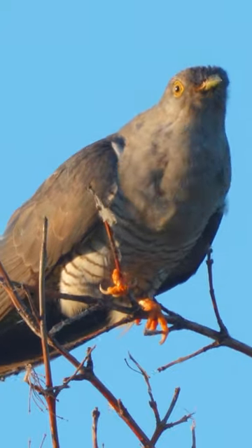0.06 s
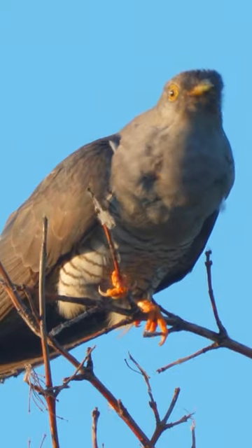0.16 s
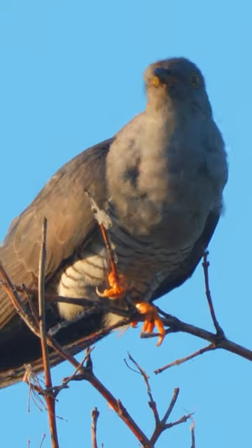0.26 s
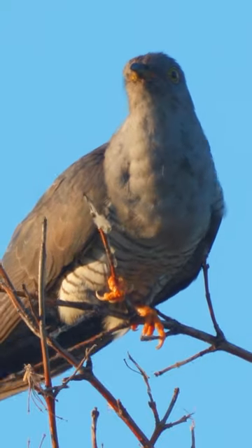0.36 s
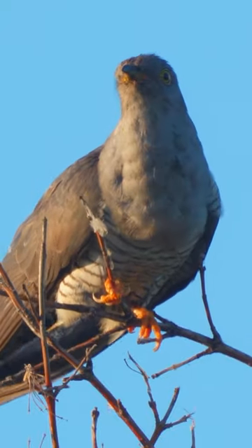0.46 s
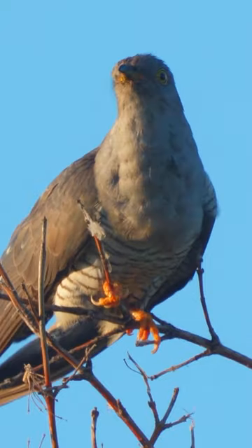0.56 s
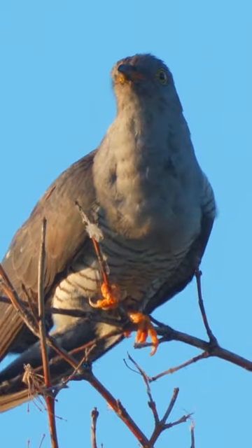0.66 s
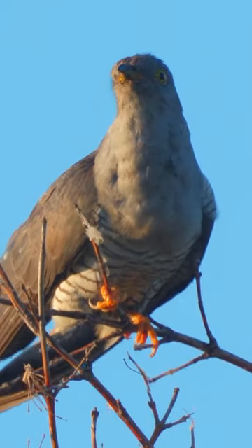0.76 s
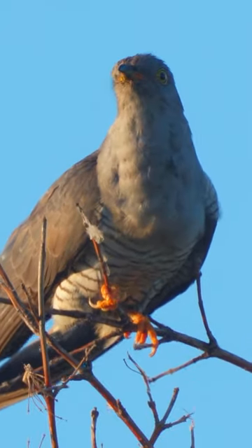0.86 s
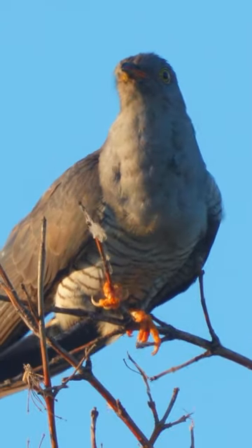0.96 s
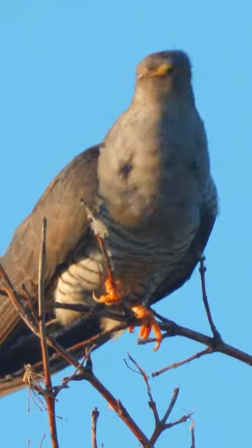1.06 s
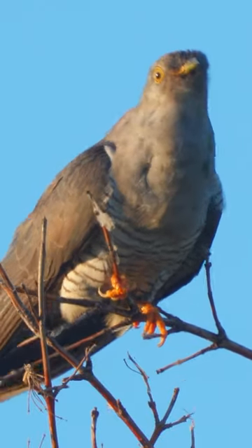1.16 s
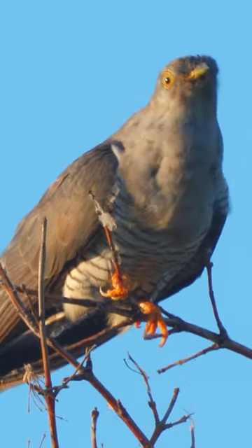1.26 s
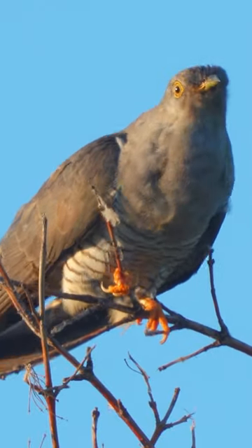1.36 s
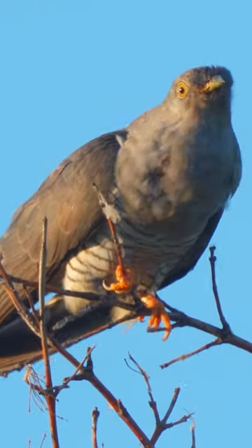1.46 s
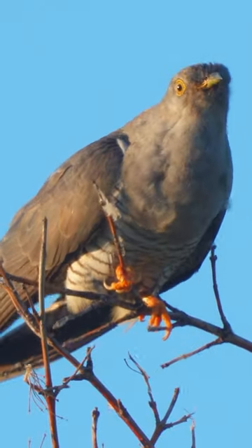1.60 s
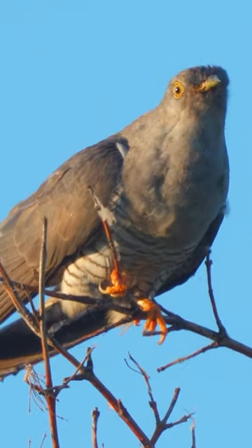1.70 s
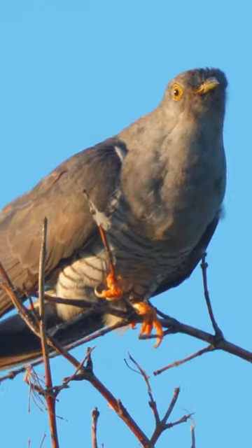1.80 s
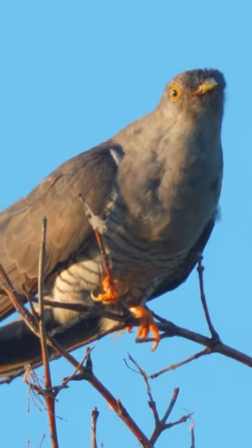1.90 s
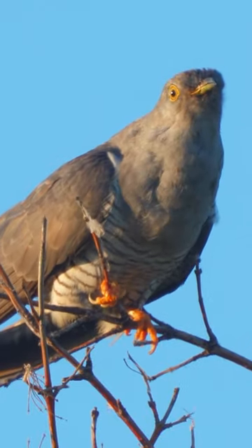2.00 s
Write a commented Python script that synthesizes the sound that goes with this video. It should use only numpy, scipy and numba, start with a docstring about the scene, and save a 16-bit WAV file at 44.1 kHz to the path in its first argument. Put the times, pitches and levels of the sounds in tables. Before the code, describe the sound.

A cuckoo dominates: opening on the echo of an earlier high note, it gives a loud, hollow low note at 0.2 s, then a brief, softer, rising high note at 1.1 and another loud low one at 1.45, with faint woodland echoes. Distant small birds whistle and trill, rattling at 1.6-1.8. Dull microphone knocks come at 0.8. A faint toad-like trill, traffic rumble, hiss and thin whine continue throughout.

```python
"""At a wood edge, a cuckoo on a bare branch calls two nearly pure notes, gliding sines that the trees echo.
Further off, small birds whistle, trill and rattle (sines bent and throbbed) and a toad-like trill pulses on.
Distant traffic rumbles and drones (shaped noise). At the microphone, soft knocks ring the camera's body, and
the camera adds hiss and a thin whine; its limiter pushes everything else down under each cuckoo note."""
import sys
import numpy as np
from scipy import signal
from scipy.fft import rfft, irfft
from scipy.io import wavfile
from scipy.ndimage import uniform_filter1d, minimum_filter1d, map_coordinates
from numba import njit

SR = 44100
rng = np.random.default_rng(int(sys.argv[2]) if len(sys.argv) > 2 else 0)


def log_audio(samples):
    """Write samples as a 16-bit WAV file to the path given in sys.argv[1]."""
    # one column per channel
    frames = np.atleast_2d(samples).T
    # limit to full scale, then quantise
    limited = np.clip(frames, -1, 1)
    pcm = np.round(limited * 32767).astype(np.int16)
    wavfile.write(sys.argv[1], SR, pcm)


N = 88200
PRE_S = .4  # lead-in, so that the echo of an earlier note is there at the start
M = N + int(PRE_S * SR)
T = np.arange(M) / SR - PRE_S  # seconds; the lead-in is negative


def undb(db):
    """Amplitude factor of a level in decibels."""
    return 10 ** (np.asarray(db) / 20)


def walk(rate_hz):
    """Smooth random drift about zero: levels held for 1 / rate_hz seconds and slewed twice."""
    hold = int(SR / rate_hz)
    steps = np.repeat(rng.standard_normal(M // hold + 1), hold)
    return 0.938 * uniform_filter1d(uniform_filter1d(steps, hold), hold)[:M]


def tail(t60_s):
    """Diffuse decay of unit energy, cut at 0.8 s, that builds up over its first 55 ms."""
    t = np.arange(int(SR * .8)) / SR
    decay = rng.standard_normal(len(t)) * np.exp(-np.log(1000) * t / t60_s) * np.minimum(t / 0.055, 1)
    return decay / np.sqrt(np.sum(decay ** 2))


def ring(t, hz, t60_s):
    """One damped resonance, starting at t = 0."""
    return np.sin(2 * np.pi * hz * t) * np.exp(-np.log(1000) * t / t60_s)


# The cuckoo's pitch glide within each note: share_of_length, pitch_hz
CU_PITCH = [(0, 491.4), (0.151, 571), (0.301, 629.6), (.45, 656), (.63, 673), (.8, 652.4), (.9, 613),
            (1, 519)]
KOO_PITCH = [(0, 495), (.1, 514.2), (.2, 519.7), (.6, 510.4), (0.851, 509.3), (1, 492)]
# Its level within each note: share_of_length, level_db (added to the note's level)
CU_LEVEL = [(0, -35), (.07, -20), (0.161, -15), (0.231, -6.5), (0.351, -2.5), (.5, 1), (.78, -1), (.9, 1.5),
            (.95, -6), (1.002, -22)]
KOO_LEVEL = [(0, -42), (.08, -15.5), (.16, -6), (0.282, -5.5), (.6, -3.5), (.84, -6.5), (.93, -5), (1, -30)]
# Calls, as they reach the limiter: start_s, length_s, level_db
CU_NOTES = [(-.145, 0.1016, 3), (1.108, .101, 3.5)]
KOO_NOTES = [(.192, 0.1644, 13.15), (1.446, 0.167, 13.6)]
# Overtones of each note, relative to its fundamental: second_harmonic_db, third_harmonic_db
OVERTONES_DB = {"cu": (-50, -52.5), "koo": (-57, -46)}
# Lift of each note in the echoes, as the higher note carries better: level_db
ECHO_LIFT_DB = {"cu": 2, "koo": -0.5}


def cuckoo_notes():
    """Near-sine notes with faint overtones, returned direct and as they set out for the wood edge."""
    direct, to_wood = np.zeros(M), np.zeros(M)
    kinds = (("cu", CU_NOTES, CU_PITCH, CU_LEVEL), ("koo", KOO_NOTES, KOO_PITCH, KOO_LEVEL))
    for kind, notes, pitch, level in kinds:
        for start_s, length_s, level_db in notes:
            share = (T - start_s) / length_s
            pitch_hz = uniform_filter1d(np.interp(share, *np.array(pitch).T), size=130)
            shape_db = uniform_filter1d(np.interp(share, *np.array(level).T), size=130)
            phase = 2 * np.pi * np.cumsum(pitch_hz) / SR
            tone = np.sin(phase)
            for harmonic, overtone_db in enumerate(OVERTONES_DB[kind], start=2):
                tone = tone + undb(overtone_db) * np.sin(harmonic * phase)
            # 4 ms fades, lying just outside the tabled start and end
            fade_s = np.minimum(share * length_s + 0.015, (1 - share) * length_s + 0.0086)
            note = tone * np.clip(fade_s / .004, 0, 1) * undb(level_db + shape_db)
            direct += note
            to_wood += note * undb(ECHO_LIFT_DB[kind])
    return direct, to_wood


# Distinct echoes from the wood edge: delay_s, level_db
WOOD_ECHOES = [(0.027, -40), (.058, -28.5), (.075, -35.5), (.1, -35), (.122, -30)]
SWAY_S, SWAY_HZ = .0006, 35  # leaves move, so each delay wavers: scale of the drift and its rate
WOOD_T60_S, WOOD_DB = 1, -30.5


def wood_echo(to_wood):
    """Reflections with wavering delays, and the diffuse tail of the wood."""
    out = np.zeros(M)
    for delay_s, level_db in WOOD_ECHOES:
        heard_at = np.arange(M) - (delay_s + SWAY_S * walk(SWAY_HZ)) * SR
        out += undb(level_db) * map_coordinates(to_wood, [heard_at], order=1)
    return out + undb(WOOD_DB) * signal.fftconvolve(to_wood, tail(WOOD_T60_S))[:M]


def cuckoo():
    """The direct call and its return from the wood edge."""
    direct, to_wood = cuckoo_notes()
    return direct + wood_echo(to_wood)


FADE_S = .012  # longest fade of a whistle, trill or rattle
# Small birds' whistles, further off: start_s, end_s, pitch_hz at start, middle, end, level_db
WHISTLES = [(0, .022, 3400, 3150, 2800, -36), (.03, .085, 4850, 4350, 3600, -50),
            (.14, .165, 4150, 4150, 4120, -44), (.338, .402, 2620, 2680, 2610, -40),
            (.412, .456, 4500, 4420, 3980, -32), (.548, .606, 2980, 2880, 2760, -43),
            (.555, .60, 4120, 4030, 3950, -46), (.61, .69, 3500, 3670, 3620, -48),
            (.742, .772, 3500, 3420, 3350, -44), (.77, .83, 3700, 3800, 3970, -45),
            (.815, .90, 3970, 3990, 3900, -39), (.822, .86, 4150, 4800, 5600, -48),
            (.858, .912, 3800, 3520, 3350, -42), (.885, 1.01, 3900, 3870, 3820, -42),
            (1.0, 1.07, 3830, 3960, 3900, -44), (1.09, 1.14, 4050, 4190, 4320, -41),
            (1.124, 1.144, 4320, 4150, 3800, -40), (1.132, 1.165, 4200, 4480, 4690, -42),
            (1.158, 1.196, 4680, 4720, 4520, -33), (1.20, 1.235, 4300, 3850, 3450, -47),
            (1.232, 1.278, 3950, 4110, 4300, -39), (1.27, 1.288, 4310, 4180, 3880, -38),
            (1.284, 1.312, 3550, 3170, 2900, -36), (1.32, 1.385, 3720, 3760, 3850, -44),
            (1.354, 1.365, 4200, 4550, 4900, -39), (1.362, 1.374, 4120, 4230, 4480, -34),
            (1.373, 1.385, 3800, 3870, 3920, -34), (1.392, 1.406, 3760, 3720, 3670, -32),
            (1.411, 1.428, 3680, 3460, 3340, -33), (1.426, 1.44, 3480, 3400, 3300, -40),
            (1.406, 1.426, 4050, 4120, 4150, -37), (1.424, 1.459, 4160, 4300, 3800, -38),
            (1.454, 1.485, 3620, 3230, 2950, -39), (1.435, 1.45, 2780, 2690, 2600, -32),
            (1.88, 1.905, 4000, 4400, 5000, -46), (1.94, 2, 3900, 4000, 3950, -46)]
# Their trills: start_s, end_s, pitch_hz at start, middle, end, level_db, swell_db (either side of the middle),
# warble_hz, warble_depth_hz, throb_hz, throb_share, pitch_scatter_hz (scale of the random drift)
TRILLS = [(.072, .18, 3555, 3180, 3000, -35, 1, 198.3, 189, 96.1, 0.48, 39.2),
          (.14, .35, 2700, 2640, 2700, -42.5, -1.5, 96.7, 63.5, 95.6, 0.44, 23),
          (.166, .37, 3033, 2980, 2900, -42, -1, 94.5, 167, 97, 0.404, 26),
          (.243, .43, 4104, 4420, 4470, -37, 4, 95, -91, 97.1, 0.3, 12),
          (.384, .51, 3520, 3600, 3530, -56, 3.5, 100, 30, 31.7, .95, 20),
          (.514, .592, 3680, 3270, 3070, -41.5, 1.5, 296.5, 148, 96, 0.48, 31),
          (.625, .745, 2330, 2400, 2560, -54, -1, 100, 33, 25.3, 0.78, 30),
          (.91, .95, 4210, 4050, 3900, -40.5, 1, 100.6, 197.5, 59.6, 0.44, 100),
          (.995, 1.09, 2536, 2600, 2300, -47, -3, 100, 195, 50, 0.29, 116),
          (1.225, 1.27, 3343, 3400, 3280, -37.5, -6.5, 109, 63, 110, 0.44, 35),
          (1.239, 1.31, 2784, 3200, 2800, -41, 2, 98.2, 343.5, 98, 0.83, 59),]
WHISTLE_SCATTER_HZ, WARBLE_DRIFT = 40, .01  # scales of the drift in pitch and in warble and throb rate


def whistles_and_trills():
    """Gliding sines with unsteady pitch; trills also warble in pitch and throb in level."""
    out = np.zeros(M)
    # a whistle is a trill without swell, warble or throb
    plain = [tuple(w) + (0, 1, 0, 1, 0, WHISTLE_SCATTER_HZ) for w in WHISTLES]
    scatter = walk(350)
    uneven_s = np.cumsum(1 + WARBLE_DRIFT * walk(60)) / SR
    for (start_s, end_s, first_hz, middle_hz, last_hz, level_db, swell_db, warble_hz, warble_depth_hz,
         throb_hz, throb_share, scatter_hz) in plain + list(TRILLS):
        on = (T >= start_s) & (T < end_s)
        share = (T[on] - start_s) / (end_s - start_s)
        t = uneven_s[on] - uneven_s[on][0]
        # parabola through the three pitches
        bend_hz = 2 * (first_hz + last_hz - 2 * middle_hz)
        pitch_hz = middle_hz + (last_hz - first_hz) * (share - .5) + bend_hz * (share - .5) ** 2
        pitch_hz += warble_depth_hz * np.sin(2 * np.pi * warble_hz * t) + scatter_hz * scatter[on]
        fade = np.clip(np.minimum(share, 1 - share) * max((end_s - start_s) / FADE_S, 2), 0, 1)
        throb = 1 - throb_share * np.cos(2 * np.pi * throb_hz * t)
        level = fade * throb * undb(level_db + swell_db * 2 * (share - .5))
        out[on] += np.sqrt(2) * level * np.sin(2 * np.pi * np.cumsum(pitch_hz) / SR)
    return out


# The rattle's two voices, which take turns: pitch_hz at start, end, buzz_depth_hz at start, end,
# level_db at start, 0.4 of the length, end, gap_share, pitch_scatter_hz (scale of the random drift)
RATTLE_VOICES = [(3254, 3600, 270, 500, -38, -26.5, -32, 0.64, 60),
                 (2816, 2850, 79, 114, -43, -35.5, -37, .5, 130)]
RATTLE_START_S, RATTLE_END_S = 1.572, 1.808
RATTLE_HZ, BUZZ_HZ = 58.8, 296.5  # beats of each voice a second, buzz within a beat


def rattle():
    """A fast even rattle of alternating high and low beats; pitch and buzz depth grow toward the end."""
    length_s = RATTLE_END_S - RATTLE_START_S
    t = T - RATTLE_START_S
    share = np.clip(t / length_s, 0, 1)
    fade = np.clip(np.minimum(share, 1 - share) * length_s / FADE_S, 0, 1)
    buzz = np.sin(2 * np.pi * BUZZ_HZ * t)
    out = np.zeros(M)
    for k, (first_hz, last_hz, first_depth_hz, last_depth_hz, first_db, middle_db, last_db,
            gap_share, scatter_hz) in enumerate(RATTLE_VOICES):
        depth_hz = first_depth_hz + (last_depth_hz - first_depth_hz) * share ** 2
        pitch_hz = first_hz + (last_hz - first_hz) * share ** 2 + depth_hz * buzz + scatter_hz * walk(350)
        # the sign flips so that one voice fills the other's gaps
        beat = 1 - (-1) ** k * gap_share * np.cos(2 * np.pi * RATTLE_HZ * t)
        level = undb(np.interp(share, [0, .4, 1], [first_db, middle_db, last_db])) * fade
        out += level * beat * np.sin(2 * np.pi * np.cumsum(pitch_hz) / SR)
    return out


BIRD_WET_DB, BIRD_T60_S = -10, 0.13


def songbirds():
    """All the small birds, with a fast flicker in level and a short diffuse tail."""
    birds = whistles_and_trills() + rattle()
    birds = birds * undb(1.6 * walk(110))
    return birds + undb(BIRD_WET_DB) * signal.fftconvolve(birds, tail(BIRD_T60_S))[:M]


TOAD_RATE_HZ, TOAD_FIRST_S = 39.27, .0225  # pulses a second, middle of one pulse
TOAD_HZ, TOAD_BASE_DB = 1479.7, -40.5  # mean pitch; level before the doubling below
TOAD_SHAPE = 0.85  # exponent on the pulse; below 1 widens it


def toad():
    """Toad-like trill: short sine pulses at a nearly even rate, wavering slightly in level and pitch."""
    cycle = (T - TOAD_FIRST_S) * TOAD_RATE_HZ + .5 + 0.014 * walk(12.0)
    pulse = (np.sin(np.pi * (cycle % 1)) ** 2) ** TOAD_SHAPE
    phase = 2 * np.pi * np.cumsum(TOAD_HZ * (1 + 0.021 * walk(30))) / SR
    return 2 * undb(TOAD_BASE_DB + 0.81 * walk(30)) * pulse * np.sin(phase)


# Soft knocks on the camera, at the microphone: start_s, level_db
KNOCKS = [(.781, -13.5), (.79, -17.5), (.807, -19.5)]
# Resonances of the camera body: pitch_hz, level_db (added to the knock's level), t60_s
CAMERA_BODY = [(134, -25, 0.063), (207, -1, 0.055), (305, -0.5, 0.045), (2070, -18, 0.028)]


def knocks():
    """Dull taps ringing the camera body's damped resonances."""
    out = np.zeros(M)
    for start_s, knock_db in KNOCKS:
        t = np.maximum(T - start_s, 0)
        for pitch_hz, mode_db, t60_s in CAMERA_BODY:
            out -= undb(knock_db + mode_db) * ring(t, pitch_hz, t60_s)
    return out


# Broad noise of distant traffic, air and camera hiss: frequency_hz, level_db per Hz
NOISE_FLOOR = [(20, -82), (30, -72), (45, -47), (105, -49), (125, -57.5), (250, -64.5), (500, -65),
               (1100, -69), (1600, -77), (2200, -82.5), (3500, -82), (4600, -80.5), (6000, -83),
               (8800, -90), (9300, -80.5), (12800, -88.5), (13500, -80), (16000, -87.5)]
SWELL_DB, FLICKER_DB = -1.06, 2.5  # scales of the shared and the separate drift in level


def noise_floor():
    """Half-octave bands of noise; the lower ones swell together and flicker alone, the hiss is steady."""
    f = np.maximum(np.fft.rfftfreq(M, 1 / SR), 1)
    floor_hz, floor_db = np.array(NOISE_FLOOR).T
    level = undb(np.interp(np.log(f), np.log(floor_hz), floor_db, left=-110)) * np.sqrt(SR / 2)
    spectrum = rfft(rng.standard_normal(M)) * level
    out, swell = np.zeros(M), walk(2.4)
    for k in range(8, 29):  # band centre 2 ** (k / 2) Hz
        band = np.cos(np.pi / 2 * np.clip(2 * np.log2(f) - k, -1, 1)) ** 2
        moving = k < 21  # centres up to 1024 Hz
        drift_db = (SWELL_DB * swell + FLICKER_DB * walk(9.18)) * moving
        out += irfft(spectrum * band, M) * undb(drift_db)
    return out


# Drones of distant traffic: pitch_hz, width_hz (between half-amplitude points), level_db (rms)
TRAFFIC_DRONES = [(60.7, 8.6, -36), (81.9, 27.5, -27), (140.4, 8.4, -39.5), (174.6, 5.7, -42.5),
                  (212, 18, -49), (359.6, 8.7, -45.5), (479.3, 35, -33)]


def traffic_drones():
    """Noise narrowed around each pitch, so that each drone wavers as narrow noise does."""
    f = np.maximum(np.fft.rfftfreq(M, 1 / SR), 1)
    out = np.zeros(M)
    for pitch_hz, width_hz, level_db in TRAFFIC_DRONES:
        peak = np.minimum(f / pitch_hz, 1) / (1 + (2 * (f - pitch_hz) / width_hz) ** 2)
        drone = irfft(rfft(rng.standard_normal(M)) * peak, M)
        out += undb(level_db) * drone / np.std(drone)
    return out


# The camera's thin whine: pitch_hz, level_db (rms)
CAMERA_WHINE = [(6751, -61), (7122, -59), (7499, -66), (9372, -66), (9749, -67), (13501, -61), (13873, -57),
                (14250, -56), (14626, -61), (15375, -65)]


def camera_whine():
    """Steady high sines, each at a random phase."""
    out = np.zeros(M)
    for pitch_hz, level_db in CAMERA_WHINE:
        out += np.sqrt(2) * undb(level_db) * np.sin(2 * np.pi * (pitch_hz * T + rng.random()))
    return out


def scene():
    """All sources at the microphone, without the lead-in."""
    animals = cuckoo() + songbirds() + toad()
    background = noise_floor() + traffic_drones() + camera_whine()
    return (animals + knocks() + background)[None, M - N:]


@njit
def recover(gain, step):
    """Gain drops at once and comes back exponentially."""
    out, g = np.empty(len(gain)), 1.
    for i in range(len(gain)):
        g = min(gain[i], g + (1 - g) * step)
        out[i] = g
    return out


CEILING, LOOK_S, RELEASE_S = 0.91, 0.0013, 0.014  # ceiling as a share of full scale
TOP_HZ = 15750


def record(dry):
    """The camera's look-ahead peak limiter holds the notes at the ceiling; then the top is cut."""
    look = int(LOOK_S * SR)
    needed = np.minimum(CEILING / (np.abs(dry[0]) + 1e-9), 1)
    needed = minimum_filter1d(needed, 2 * look + 1)
    gain = uniform_filter1d(recover(needed, 1 / (RELEASE_S * SR)), look)
    top_cut = signal.ellip(10, .2, 80, TOP_HZ, fs=SR, output="sos")
    return signal.sosfilt(top_cut, dry * gain)


dry = scene()
out = record(dry)
log_audio(out)
```